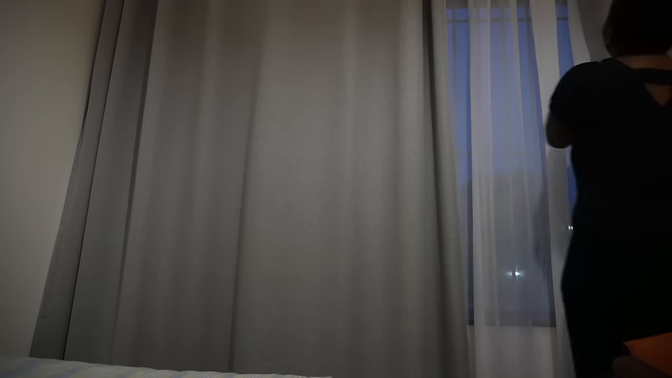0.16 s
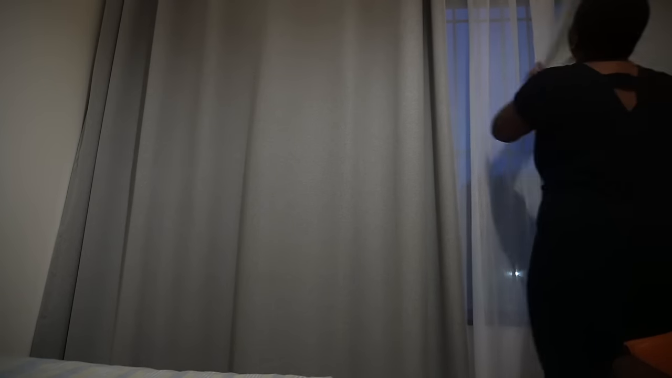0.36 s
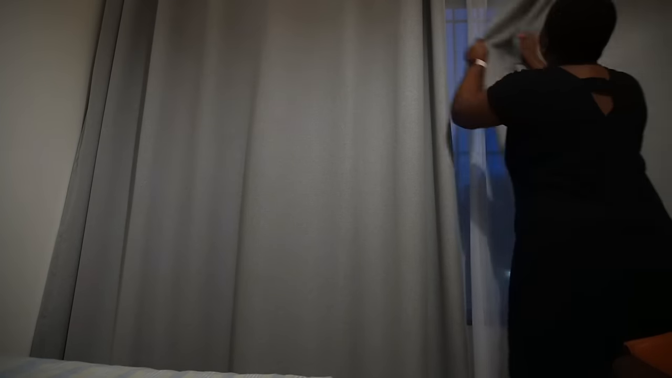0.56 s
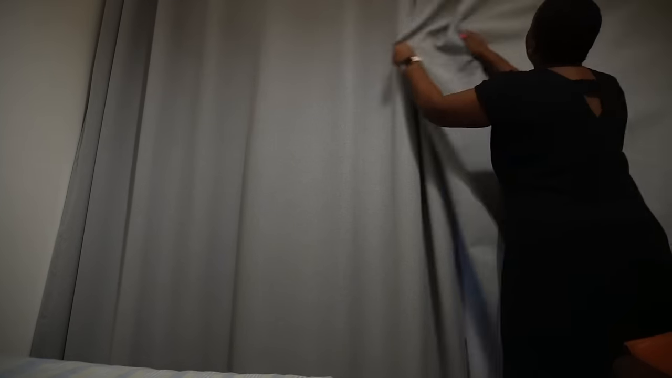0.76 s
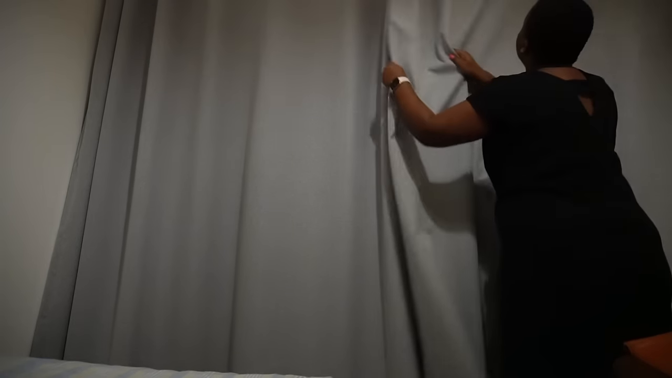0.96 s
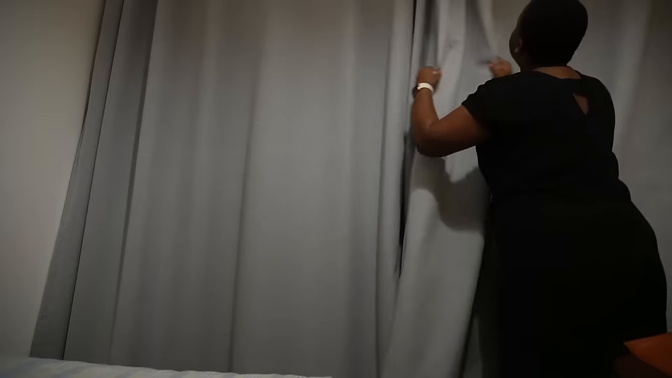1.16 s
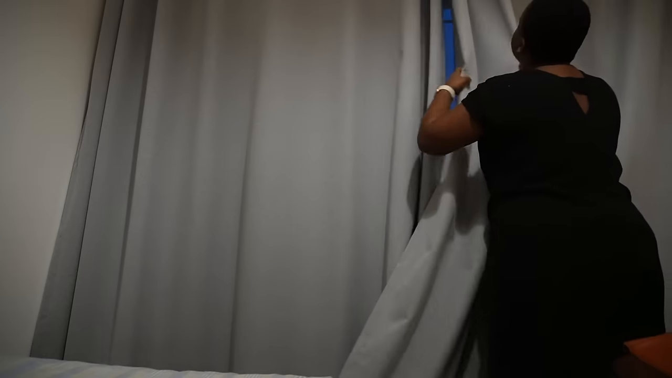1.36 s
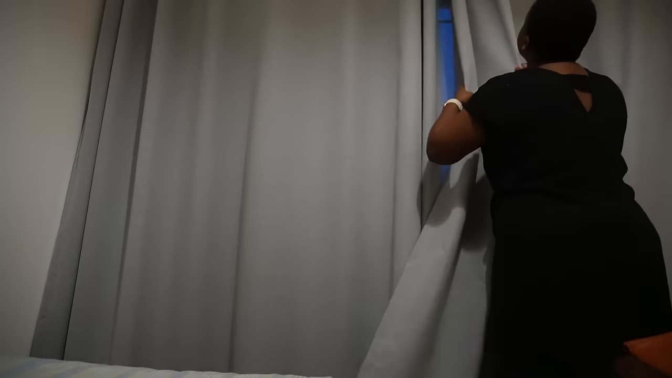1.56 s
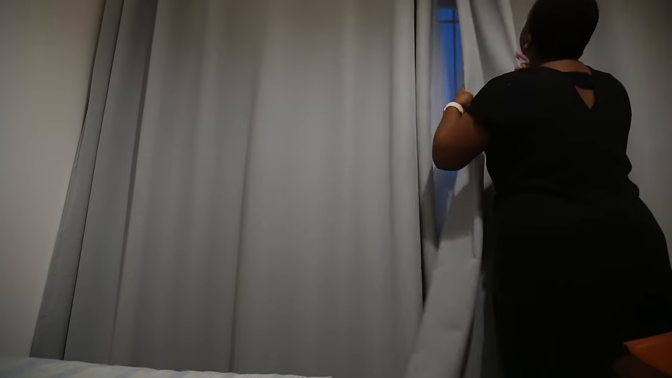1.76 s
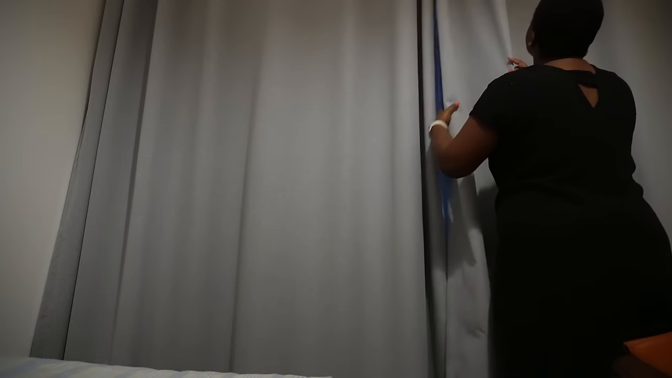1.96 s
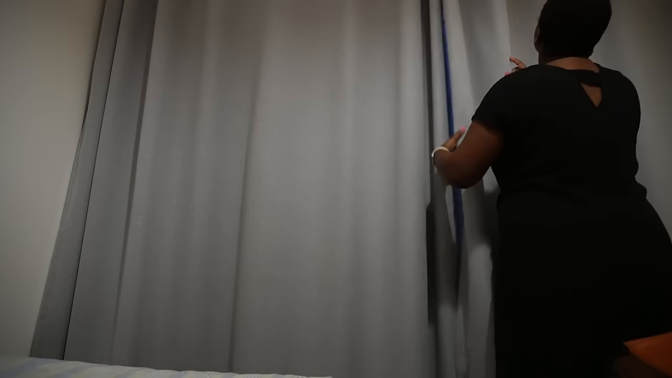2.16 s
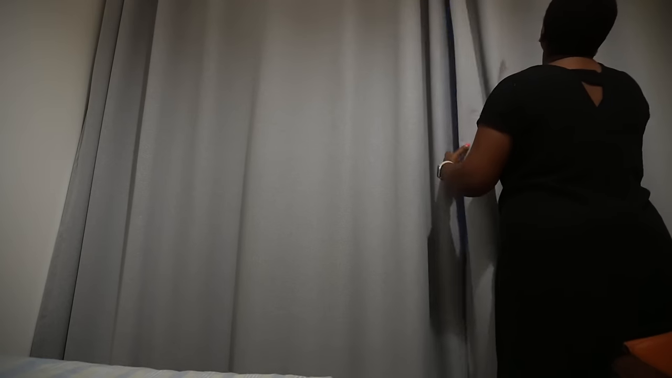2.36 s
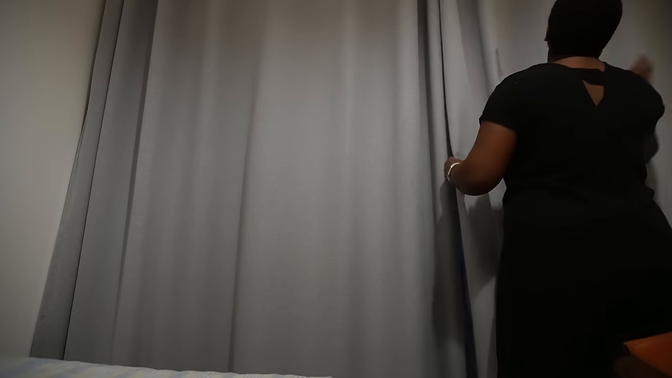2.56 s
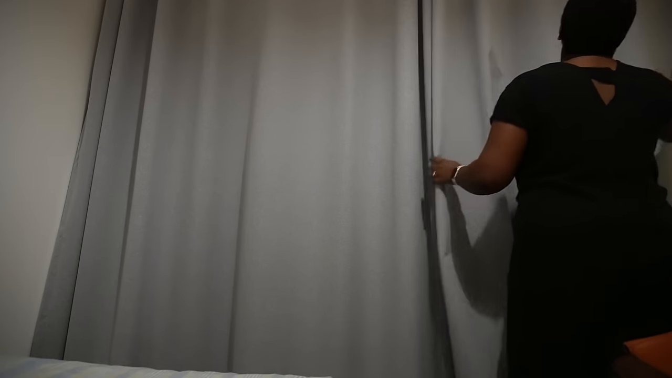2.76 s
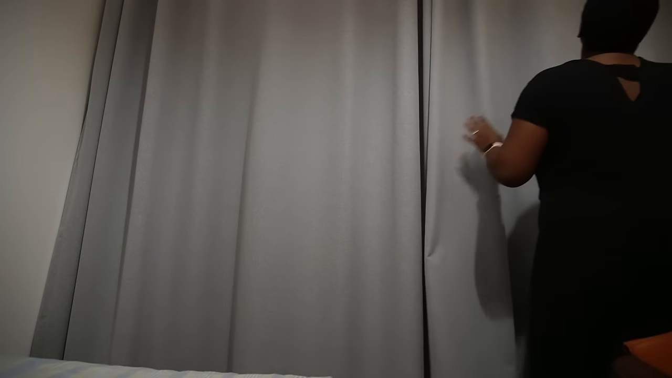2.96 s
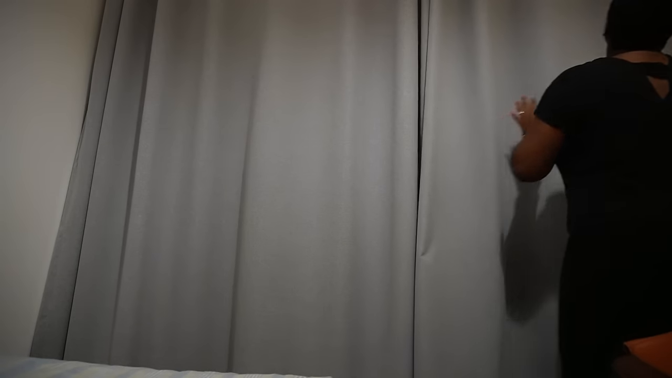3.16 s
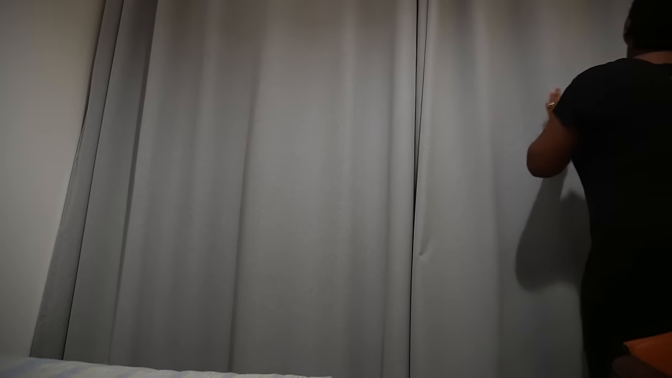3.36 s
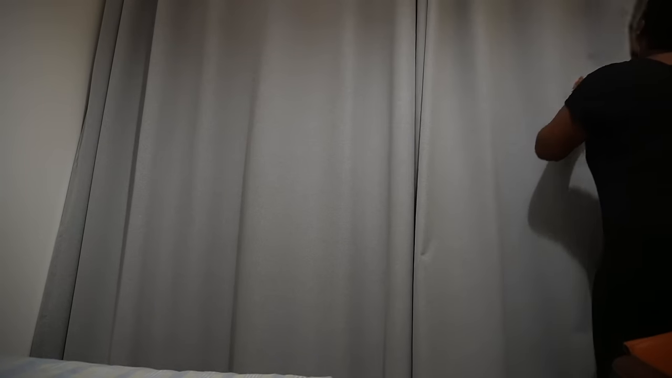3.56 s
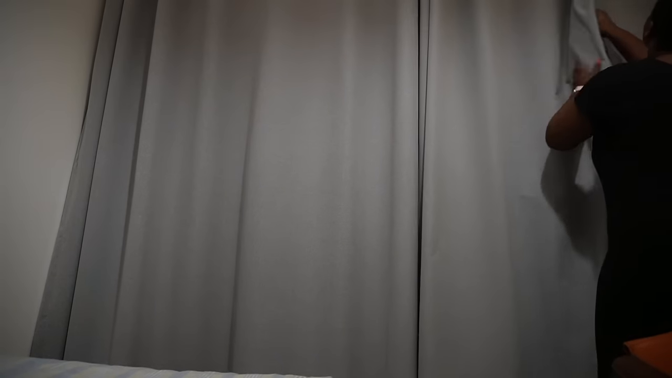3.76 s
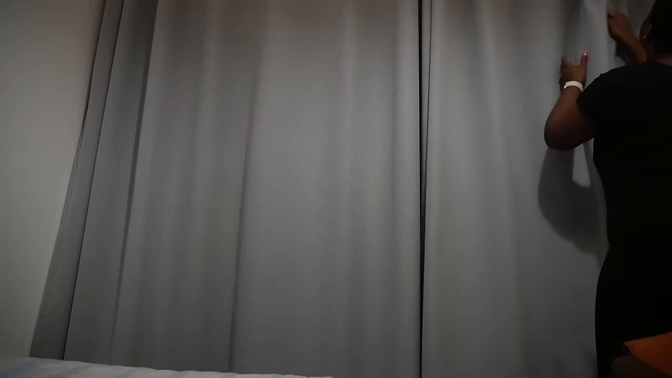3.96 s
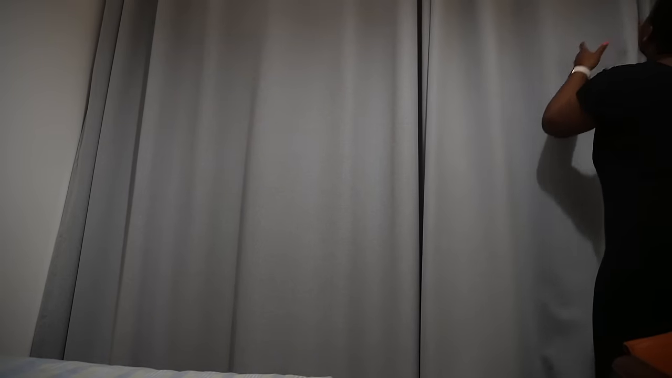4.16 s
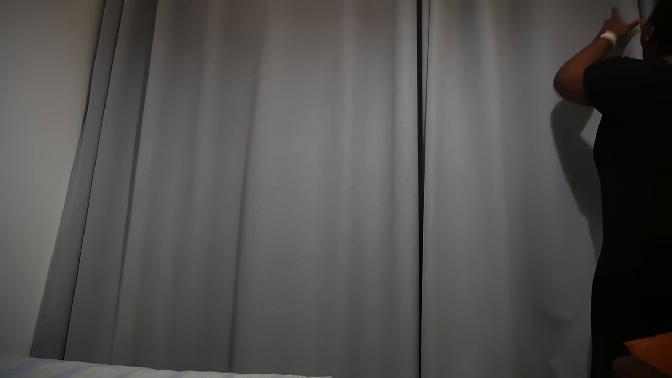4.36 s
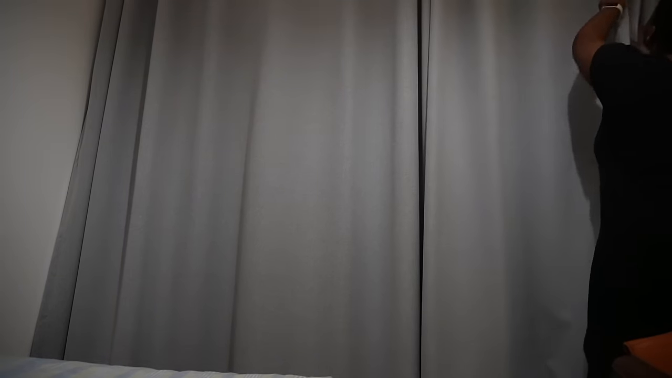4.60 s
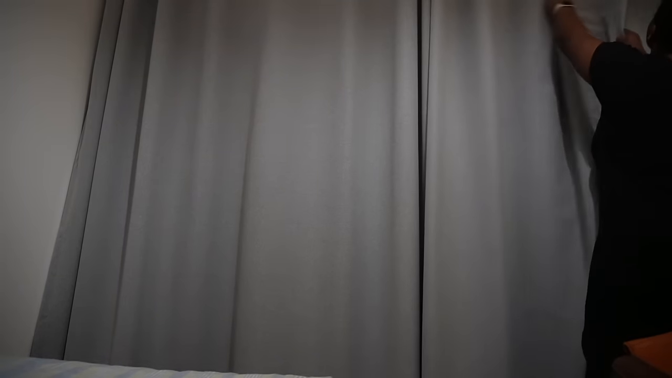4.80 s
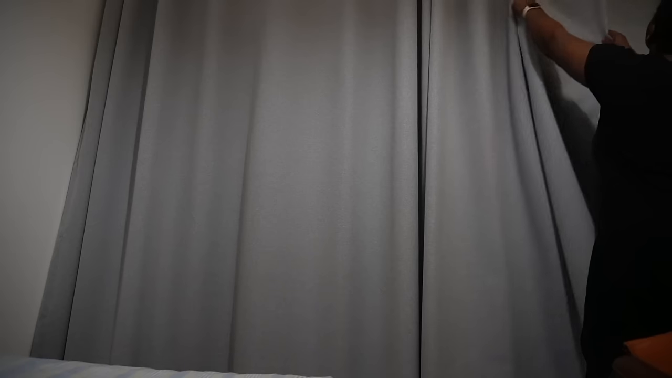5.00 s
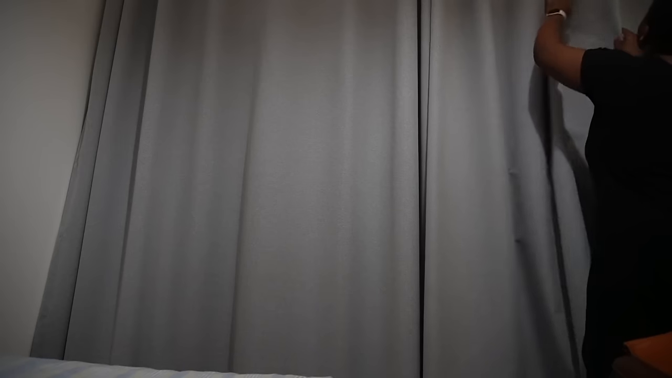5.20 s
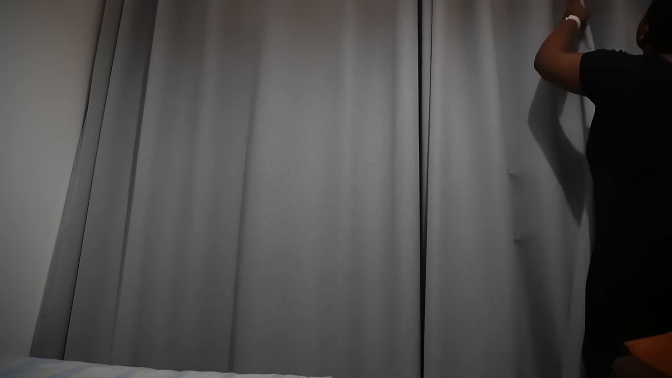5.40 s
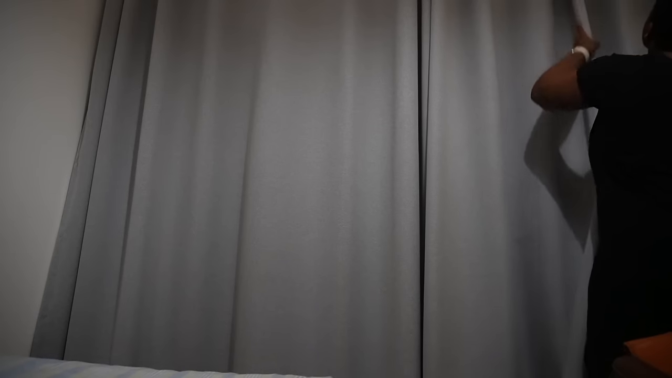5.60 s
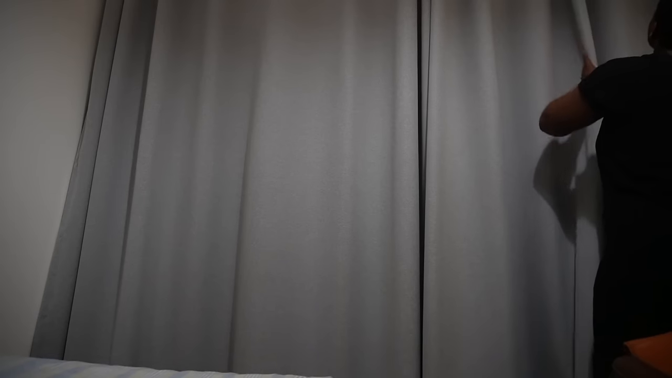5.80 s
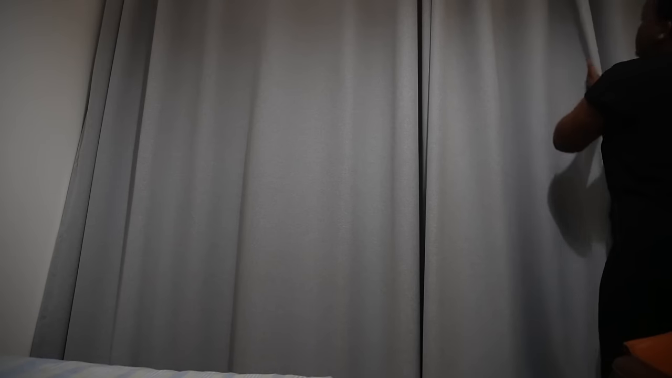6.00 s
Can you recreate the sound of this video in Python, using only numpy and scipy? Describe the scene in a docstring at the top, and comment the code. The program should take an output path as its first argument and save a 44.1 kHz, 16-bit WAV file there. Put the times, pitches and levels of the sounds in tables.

```python
"""Heavy curtains on a metal track in a quiet bedroom, over a room hum and a thin electric whine throughout.
First a tug and loose knocks; from 0.45 s a fast pull makes the runners rattle and the cloth swish and flap.
Until 3.5 s hands tug the folds amid knocks, thuds and rustle; fast pulls follow at 3.6 s and 4.8 s, then tugs.
Plastic and metal are struck resonators, cloth and hum are shaped noise, thuds are damped sines,
footfalls are noise through a floor resonance, and the room adds diffuse decaying echoes."""
import sys
import numpy as np
from scipy import signal
from scipy.io import wavfile

SR = 44100
rng = np.random.default_rng(int(sys.argv[2]) if len(sys.argv) > 2 else 0)


def inscribe(sig):
    """Save sig as 16-bit PCM at rate SR to the path in sys.argv[1].

    A 1-D sig is mono; a 2-D sig holds one channel per row.
    Samples are clipped to [-1, 1] before scaling.
    """
    pcm = np.round(np.clip(np.atleast_2d(sig).T, -1, 1) * 32767)
    wavfile.write(sys.argv[1], SR, pcm.astype(np.int16))


N = 266408


def from_db(db):
    """Decibel definition: amplitude gain grows tenfold per 20 dB."""
    return 10 ** (np.asarray(db) / 20)


def rms_one(x):
    """Normalisation: equal effective value, rms 1."""
    return x / np.sqrt(np.mean(x ** 2) + 1e-20)


def times():
    """Uniform sampling: the time in seconds of every sample."""
    return np.arange(N) / SR


def at_hz(points, hz):
    """Logarithmic frequency: values are interpolated linearly over log frequency."""
    points = np.array(points)
    return np.interp(np.log(hz), np.log(points[:, 0]), points[:, 1])


def summed_db(levels_db):
    """Energy summation: the powers of uncorrelated sounds add."""
    return 20 * np.log10(np.sqrt(np.sum(from_db(levels_db) ** 2, axis=0)))


def swell_db(start, held, rise, fall):
    """Exponential growth and decay: straight slopes [dB/s] around a held 0 dB, floored at -90 dB."""
    t = times()
    before = np.maximum(start - t, 0)
    after = np.maximum(t - start - held, 0)
    return np.maximum(-rise * before - fall * after, -90)


def drift(rate_hz):
    """Low-pass random process: slow noise of unit spread, computed at every 40th sample."""
    pole = np.exp(-80 * np.pi * rate_hz / SR)
    white = rng.standard_normal(N // 40 + 2002)
    slow = signal.lfilter([1], [1, -2 * pole, pole * pole], white)[2000:]   # settled part only
    return np.interp(np.arange(N) / 40, np.arange(len(slow)), rms_one(slow))


def ring(clicks, hz, t60):
    """Damped resonator: a unit impulse excites a sine of initial height 1 that falls 60 dB in t60 [s]."""
    radius = 10 ** (-3 / (t60 * SR))
    angle = 2 * np.pi * hz / SR
    return signal.lfilter([0, np.sin(angle)], [1, -2 * radius * np.cos(angle), radius ** 2], clicks + 1e-18)


def decaying(clicks, time_constant):
    """Exponential relaxation: each click falls to 1/e in the time constant [s]."""
    return signal.lfilter([1], [1, -np.exp(-1 / (time_constant * SR))], clicks)


def bandpass(x, low_hz, high_hz):
    """Band limitation: only the range between two corners passes."""
    return signal.sosfilt(signal.butter(2, [low_hz, high_hz], "band", fs=SR, output="sos"), x)


def highpass(x, order, hz):
    """Weak low-frequency radiation: sound below the corner is reduced."""
    return signal.sosfilt(signal.butter(order, hz, "high", fs=SR, output="sos"), x)


def bands():
    """Constant relative bandwidth: half-octave filters with their centres [Hz]."""
    edges = 20 * 2 ** np.arange(0, 10, .5)
    return [(signal.butter(2, pair, "band", fs=SR, output="sos"), np.sqrt(pair[0] * pair[1]))
            for pair in zip(edges, edges[1:])]


def coloured_noise(spectrum, patchy_db, rate):
    """Subtractive synthesis: noise bands with shared and separate level drift; rms 1."""
    white = rng.standard_normal((2, N))
    together = drift(rate)
    top_hz = spectrum[-1][0] * 2
    total = np.zeros(N)
    for k, (sos, hz) in enumerate(bands()):
        if hz < top_hz:
            level_db = at_hz(spectrum, hz) + patchy_db * (together + drift(rate))
            total += from_db(level_db) * signal.sosfilt(sos, white[k % 2])
    return rms_one(total)


# Spectrum of the room hum: (frequency [Hz], relative level per hertz [dB])
HUSH = [(20, -14), (55, 3), (75, -4.5), (100, 6), (150, 2), (230, 7), (600, -3), (1000, 1.5), (2000, -11),
        (4000, -12.5), (8000, -19), (15700, -26.5)]
HUSH_DB = -57   # rms


def room_hum():
    """Stationary broadband noise: a low-weighted spectrum whose bands wander slowly."""
    return from_db(HUSH_DB) * coloured_noise(HUSH, patchy_db=4.5, rate=0.6)


# Steady electric tones: (frequency [Hz], rms level before flicker [dB])
WHINE = [(657, -72.5), (3951, -88), (7908, -79.5)]


def whine():
    """Amplitude modulation: thin pure tones flicker irregularly in level."""
    total = np.zeros(N)
    for hz, db in WHINE:
        amplitude = np.sqrt(2) * from_db(db + 3.9 * drift(17))
        total += amplitude * np.sin(2 * np.pi * hz * times())
    return total


# Decay of the bedroom: (frequency [Hz], reverberation time T60 [s])
ROOM = [(100, 0.7), (300, 0.24), (1000, 0.13), (4000, 0.22), (12000, 0.17)]


def bedroom(x):
    """Diffuse reverberation: convolution with noise that decays band by band, after a short gap."""
    t = np.arange(SR * 3 // 4) / SR
    white = rng.standard_normal(len(t))
    tail = sum(signal.sosfilt(sos, white) * 10 ** (-3 * t / at_hz(ROOM, hz)) for sos, hz in bands())
    tail = tail * np.clip((t - .003) / 0.014, 0, 1)   # 3 ms gap, then a 14 ms build-up
    return signal.fftconvolve(x, tail / np.sqrt(np.sum(tail ** 2)))[:N]


FLUTTER_S, FLUTTER_DB = .021, -7   # delay and level change of each repeat


def flutter(x):
    """Flutter echo: three repeats between two facing walls, each weaker."""
    lag = round(FLUTTER_S * SR)
    return x + sum(from_db(k * FLUTTER_DB) * np.pad(x, (k * lag, 0))[:N] for k in range(1, 4))


STEP_RISE_DB_PER_S, STEP_FALL_DB_PER_S, FLOOR_REST_DB = 61, 70, -73
# Footfalls and shifts of weight: (time [s], level at the swell's top [dB])
STEPS = [(0.0, -68), (.37, -54), (.84, -57), (1.24, -59), (3.2, -61), (3.8, -53), (4.96, -52), (5.5, -59)]


def treading():
    """Energy summation: each step swells and fades over the floor's resting level."""
    swells = [db + swell_db(s, 0, STEP_RISE_DB_PER_S, STEP_FALL_DB_PER_S) for s, db in STEPS]
    return summed_db([np.full(N, FLOOR_REST_DB)] + swells)


def rumble(rumble_db):
    """Forced resonance: noise drives two low floor resonances in series."""
    floor = ring(ring(rng.standard_normal(N), 55, 0.16), 48.0, 0.053)
    return from_db(rumble_db) * rms_one(floor)


# Soft thuds of hems, hands and feet: (time [s], relative level [dB], pitch [Hz])
THUDS = [(0.369, -24, 346), (0.388, -23.5, 177), (0.928, -29, 262), (1.165, -32.5, 395),
         (1.228, -15.5, 313), (1.25, -25.5, 210), (1.657, -37, 235), (2.435, -52, 304), (3.082, -39.5, 223),
         (3.232, -35.5, 224), (3.258, -32.5, 383), (3.681, -28, 228), (4.775, -31, 240), (5.04, -25.5, 286),
         (5.458, -41, 315)]


def thuds():
    """Damped oscillation: a soft push swells and rings for a couple of cycles, with flutter echoes."""
    out, t = np.zeros(N + SR), np.arange(SR // 5) / SR
    for s, level_db, hz in THUDS:
        cycles = t * hz
        swell = np.exp(-cycles / 1.28) * (1 - np.exp(-cycles / 0.72))
        thud = from_db(level_db + 5.5) * np.sin(2 * np.pi * cycles) * swell
        out[round(s * SR):][:len(t)] += thud
    return flutter(highpass(out[:N], 2, 110))


PULL_COLOUR_HZ, BRIGHTENS_PER_DB = 1110, 0.07   # rattle colour at -35 dB; octaves gained per dB
PULL_FLAP_DB, FLAP_FOLLOWS = -43, 0.77   # flapping at -35 dB of rattle; share of its swing
TUG_RISE_DB_PER_S, TUG_FALL_DB_PER_S = 136, 102
# Three fast pulls, one curve each: (time [s], runner rattle control level [dB], cloth swish control level [dB])
PULLS = [
    [(.45, -56, -67), (.52, -45, -56.5), (.72, -35, -43), (.89, -30, -38), (.925, -35.5, -36),
     (.95, -25.5, -35), (1.04, -33.5, -45), (1.19, -53.5, -68)],
    [(3.64, -74, -75), (3.69, -41, -58), (3.77, -34, -41.5), (3.84, -39.5, -49), (3.88, -34, -44.5),
     (4.0, -43, -58.5), (4.055, -50, -64), (4.07, -48, -51), (4.25, -54.5, -78)],
    [(4.76, -60, -88), (4.8, -42, -80), (4.84, -45.5, -59), (4.88, -32.5, -40), (4.93, -33, -46.5),
     (5.03, -29, -36.5), (5.16, -48.5, -58.5), (5.25, -49.5, -63), (5.45, -58, -87)],
]
# Hands tug and brush the folds: (start [s], held [s], runner rattle control level [dB],
# rattle colour [Hz], cloth flapping level [dB])
TUGS = [(.07, .22, -43, 570, -48), (.38, 0.017, -45.5, 440, -42.5), (1.22, 0.051, -46, 510, -40),
        (1.56, 0.028, -50.5, 707, -56.5), (2.04, 0.041, -54, 754, -66.5), (2.25, 0.025, -59, 750, -57),
        (2.6, 0.016, -61, 532, -57), (2.81, 0.052, -59, 980, -63.5), (3.22, 0.045, -52, 440, -47.5),
        (3.45, 0.25, -56, 850, -51), (4.45, 0.17, -60.5, 695, -57), (4.68, 0.054, -58.5, 900, -57),
        (5.62, 0.068, -61.5, 1000, -72), (5.829, 0.01, -51.5, 620, -48), (6.02, 0.016, -58, 760, -71)]
# Faint rustle of the hanging cloth: (time [s], swish control level [dB])
RUSTLE = [(0, -56.5), (.33, -56.5), (0.452, -62.5), (1.2, -65), (1.33, -59.5), (1.6, -65.5), (1.93, -81.5),
          (2.05, -61.5), (2.3, -73), (2.7, -64), (3.01, -87), (3.28, -64), (3.38, -68.5), (3.57, -73),
          (4.27, -76), (4.47, -64), (4.7, -64.5), (5.499, -88), (5.65, -68), (5.74, -61.5), (6.04, -72)]


def pulls_db(column):
    """Energy summation: one column of all pull curves, silent outside each."""
    curves = []
    for pull in PULLS:
        moments, levels = np.transpose(pull)[[0, column]]
        curves.append(np.interp(times(), moments, levels, left=-120, right=-120))
    return summed_db(curves)


def motion():
    """Common excitation: pulls and tugs together set the rattle, its colour, the swish and the flapping."""
    pull_db, slide_db = pulls_db(1), pulls_db(2)
    rattles = [pull_db]
    colours = [PULL_COLOUR_HZ * 2 ** (BRIGHTENS_PER_DB * (pull_db + 35))]
    flaps = [PULL_FLAP_DB + FLAP_FOLLOWS * (pull_db + 35)]
    for start, held, db, hz, flap_db in TUGS:
        shape_db = swell_db(start, held, TUG_RISE_DB_PER_S, TUG_FALL_DB_PER_S)
        rattles.append(db + shape_db)
        colours.append(np.full(N, hz))
        flaps.append(flap_db + shape_db)
    colour_hz = np.average(colours, axis=0, weights=from_db(rattles) ** 2)   # the stronger motion decides
    rustle_db = np.interp(times(), *np.transpose(RUSTLE))
    return summed_db(rattles), colour_hz, summed_db([slide_db, rustle_db]), summed_db(flaps)


# Air pushed by the folds: (frequency [Hz], relative level per hertz [dB])
FLAP = [(47, -32), (80, -17.5), (102, -3.5), (172, -13.5), (195, -4.5), (286, -5), (500, -11.5), (650, -7),
        (1100, -120)]


def flapping(flap_db):
    """Volume displacement: moving folds push low noise, but are too narrow to push deep bass."""
    return from_db(flap_db) * highpass(coloured_noise(FLAP, patchy_db=2.0, rate=11), 4, 92)


# Cloth on cloth: (frequency [Hz], relative level per hertz [dB])
SWISH = [(180, -38), (300, 11), (360, -29), (734, -20.5), (1980, -2), (4040, -13), (4610, -6), (7700, -18),
         (8790, -15), (15700, -34)]


def swish(swish_db):
    """Friction noise: cloth rubs on cloth, and the loudest, fastest slides keep the track ringing."""
    rub = from_db(swish_db + .4 * (swish_db + 40)) * rng.standard_normal(N)   # steeper than the swish
    track = sum(from_db(db - 33) * ring(rub, hz, t60) for hz, db, t60 in TRACK)
    cloth = coloured_noise(SWISH, patchy_db=1.5, rate=15)
    dull = signal.sosfilt(signal.butter(1, 7000, fs=SR, output="sos"), cloth)
    bright = np.clip((swish_db + 64.5) / 22, 0, 1)   # slow cloth loses its top
    return from_db(swish_db + 4.5) * (dull + bright * (cloth - dull)) + track


# Short rings of the plastic runners: (frequency [Hz], relative level [dB], T60 [s])
RUNNER = [(440, -4.5, 0.027), (596, -6, 0.014), (810, 2.5, 0.0093), (1010, 1.5, 0.011), (1194, 1.5, 0.0084),
          (1430, -1.5, 0.011), (1683, -1, 0.014), (1960, -1.5, 0.0086), (2325, -1.5, 0.01),
          (2830, -9, 0.015), (3130, -16, 0.024)]
# Rings of the metal track: (frequency [Hz], relative level [dB], T60 [s])
TRACK = [(3670, -8, .06), (4550, -4, .1), (8560, 0, .04), (9110, -6, .04), (9690, -6, .03),
         (10900, -4, .015), (11700, -8, .02), (13800, -3, .012)]


def rattle(rattle_db, colour_hz):
    """Random impact excitation: jolts in clumps are dealt to runner modes, strongest near the colour."""
    sizes = from_db(1.89 * np.minimum(rng.exponential(1, N), 5)) * rng.choice([-1, 1], N)
    jolts_per_s = 4000 * from_db(3.0 * drift(30))
    struck = rng.random(N) < jolts_per_s / SR
    jolts = sizes * struck * from_db(rattle_db) / np.std(sizes)
    dealt = rng.integers(0, len(RUNNER), N)
    out = np.zeros(N)
    for hz, db, t60 in TRACK:   # the jolts also ring the track
        out += from_db(db - 38.0 - 6.4 * np.log2(hz / 4000)) * ring(jolts, hz, t60)
    for k, (hz, db, t60) in enumerate(RUNNER):
        mode_db = db + 1.0 - 3.72 * np.abs(np.log2(hz / colour_hz))
        out += ring(jolts * (dealt == k) * from_db(mode_db), hz, t60)
    return out


# Runners and hooks knocking: (time [s], relative level [dB], centre of the blow's colour [Hz],
# relative treble [dB])
KNOCKS = [(0.04, -27.5, 593, -14), (0.177, -24, 484, -27), (0.219, -28.5, 1130, -9.5),
          (0.27, -31, 1210, -5.5), (0.349, -28.5, 920, -10), (0.514, -37, 1030, -1),
          (0.547, -26.5, 1000, -9.5), (0.65, -22.5, 565, -8), (0.78, -16.5, 740, -9), (0.917, -21, 800, -7),
          (0.931, -15, 1240, 2), (0.95, -17.5, 810, 3), (1.193, -34.5, 750, -29), (1.231, -22.5, 800, -38),
          (1.545, -28, 650, -11.5), (2.23, -36.5, 800, -19), (2.25, -38.5, 840, -11),
          (2.441, -34.5, 796, -15), (2.576, -36.5, 880, -26), (2.781, -37.5, 786, -32),
          (2.817, -33, 1050, -30), (2.91, -35.5, 760, -14), (3.503, -34, 800, -29),
          (3.54, -38.5, 990, -3.5), (3.562, -39.5, 1010, -25), (3.614, -32.5, 860, -28),
          (3.769, -17.5, 1950, -12), (3.843, -26, 1410, -21), (3.884, -17.5, 1680, -8),
          (4.04, -31.5, 1100, -27), (4.068, -38.5, 2140, -1), (4.362, -34.5, 690, -25),
          (4.702, -38, 1010, -21), (4.72, -34, 804, -32), (4.795, -23.5, 540, -14), (4.869, -17, 1180, -10),
          (4.926, -15, 1100, -10), (4.958, -13.5, 1430, 0.5), (4.972, -20, 980, -29),
          (5.025, -24, 930, 2.5), (5.058, -25.5, 1050, -19), (5.271, -47, 1500, 4), (5.331, -35, 915, -32),
          (5.465, -25.5, 1010, -18), (5.725, -36, 590, -19), (5.906, -46, 1080, -17),
          (5.979, -28.5, 1060, -18)]


def knocks():
    """Modal impact: a contact of a few ms favours runner modes near its colour; treble adds crack and track."""
    s, level_db, colour_hz, treble_db = np.transpose(KNOCKS)
    at = np.round(s * SR).astype(int)
    out, grit = np.zeros(N), rng.standard_normal((2, N))
    for k, (hz, db, t60) in enumerate([*RUNNER, *TRACK]):
        if k < len(RUNNER):
            away_db = -14.0 * np.abs(np.log2(hz / colour_hz)) - 20.0
        else:
            away_db = treble_db - 46.0 - 10.0 * np.log2(hz / 4550)
        clicks = np.zeros(N)
        clicks[at] = from_db(level_db + db + away_db)
        contact = decaying(clicks, 0.0062) * grit[k % 2]
        first_impact = 3 * clicks * (-1) ** k   # alternating sign from mode to mode
        out += ring(contact + first_impact, hz, t60)
    hits = np.zeros(N)
    hits[at] = from_db(level_db + treble_db)
    crack = decaying(hits, 0.0057) * rng.standard_normal(N)
    fizz = decaying(hits, 0.0071) * rng.standard_normal(N)   # hiss of the jerked cloth
    out += from_db(-17.0) * bandpass(fizz, 3500, 11000)
    return out + from_db(2.0) * bandpass(crack, 1300, 4000)


def scene():
    """Superposition: curtain, track and their echoes add to the steps, hum and whine."""
    rattle_db, colour_hz, swish_db, flap_db = motion()
    blows, runners = highpass([knocks(), rattle(rattle_db, colour_hz)], 2, 300)   # small parts radiate no bass
    pushes = thuds()
    flap = flapping(flap_db)
    hum = room_hum()
    steps = rumble(treading())
    cloth = swish(swish_db)
    sent = from_db(-17.5) * cloth + from_db(-2.5) * blows
    sent = sent + from_db(-14.5) * pushes + from_db(-15.0) * runners
    echoes = bedroom(sent)
    return (blows + pushes + runners + echoes + cloth + flap + steps + hum + whine())[None]


def record(dry):
    """Band limitation: a steep elliptic low-pass cuts the top at 15750 Hz."""
    return signal.sosfilt(signal.ellip(12, .5, 70, 15750, fs=SR, output="sos"), dry)


dry = scene()
out = record(dry)
inscribe(out)
```